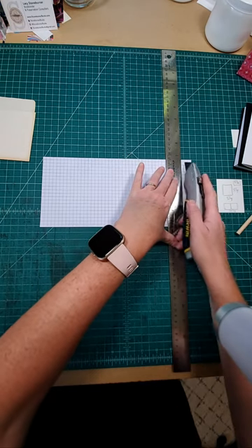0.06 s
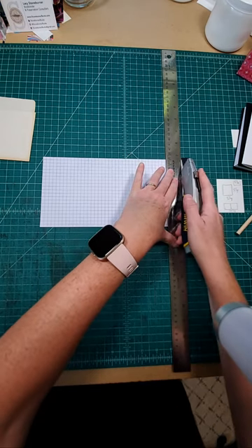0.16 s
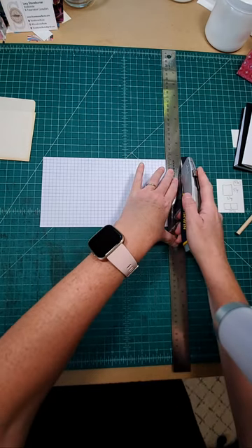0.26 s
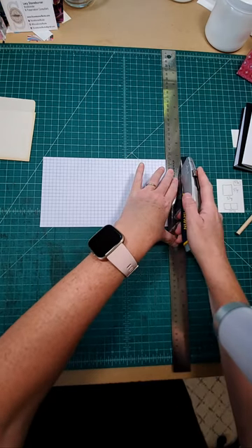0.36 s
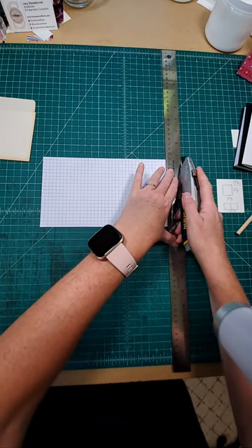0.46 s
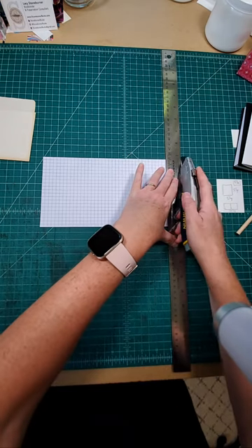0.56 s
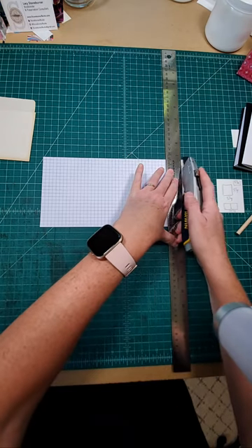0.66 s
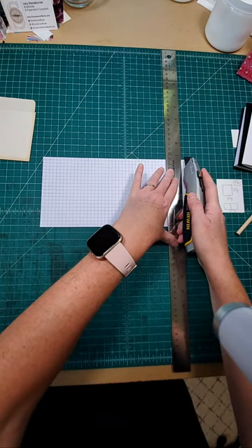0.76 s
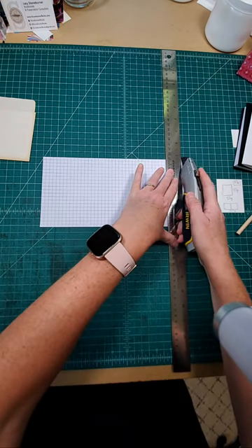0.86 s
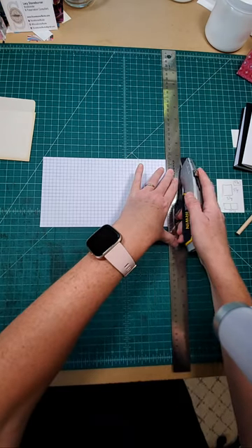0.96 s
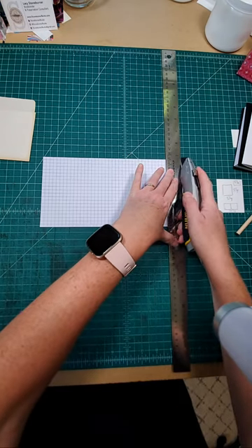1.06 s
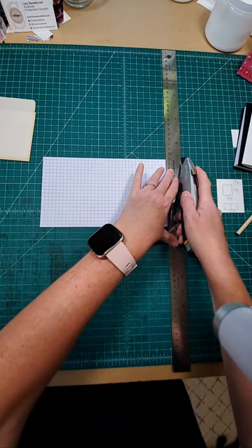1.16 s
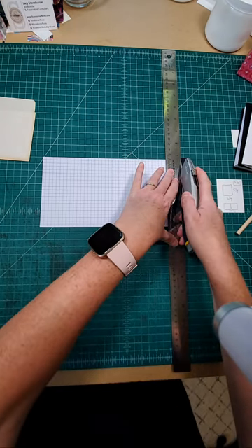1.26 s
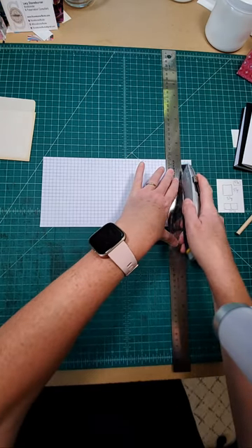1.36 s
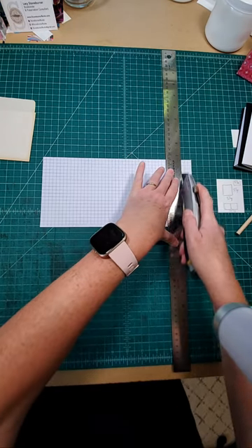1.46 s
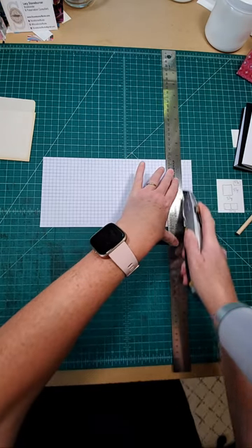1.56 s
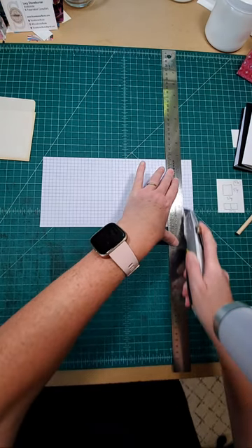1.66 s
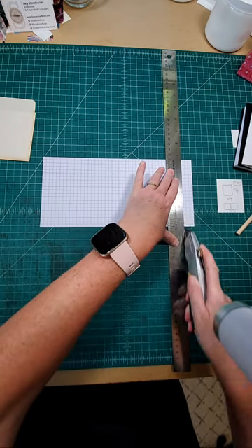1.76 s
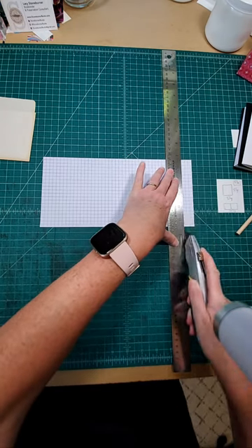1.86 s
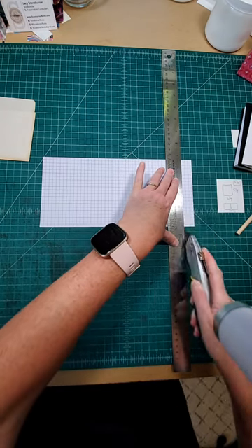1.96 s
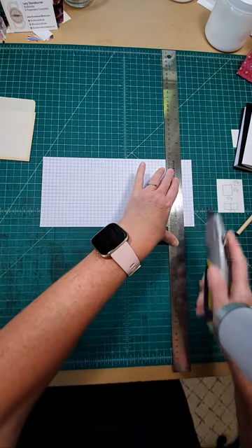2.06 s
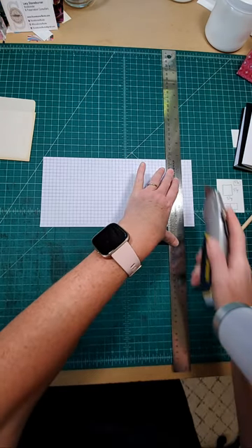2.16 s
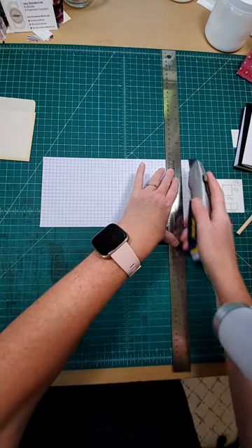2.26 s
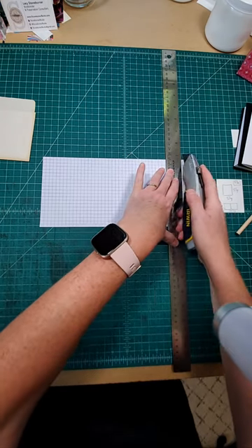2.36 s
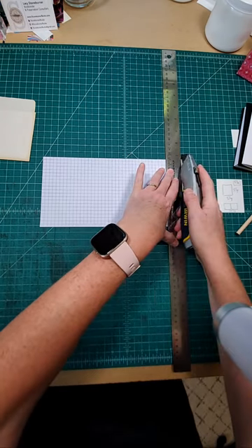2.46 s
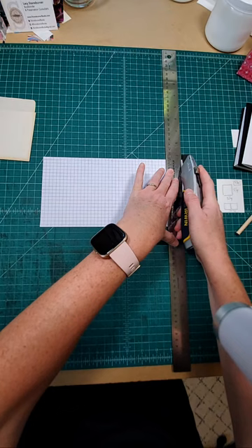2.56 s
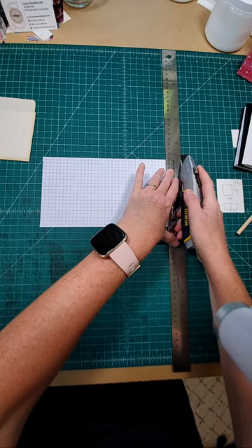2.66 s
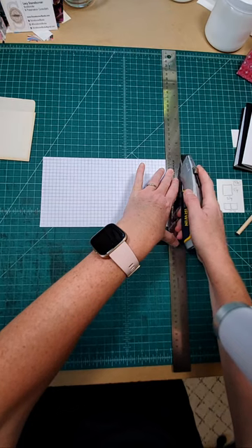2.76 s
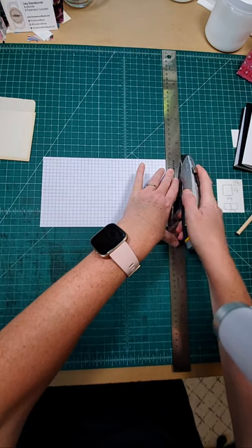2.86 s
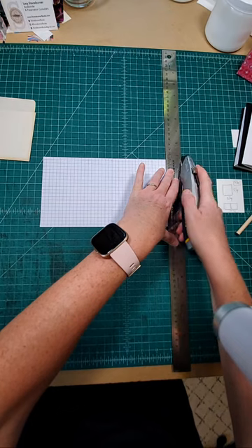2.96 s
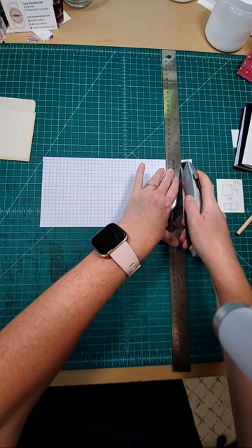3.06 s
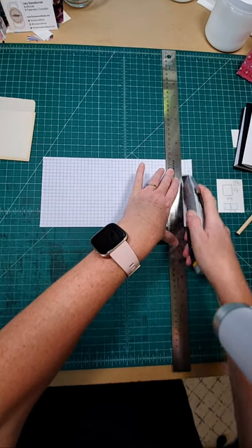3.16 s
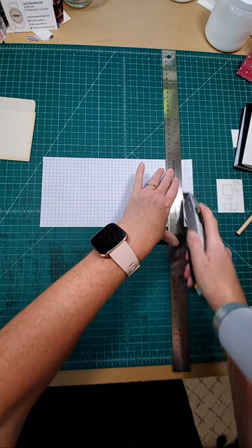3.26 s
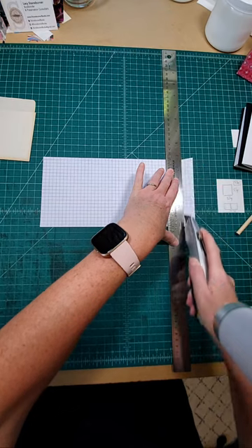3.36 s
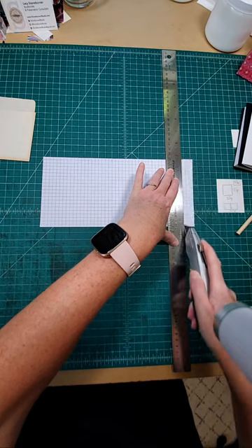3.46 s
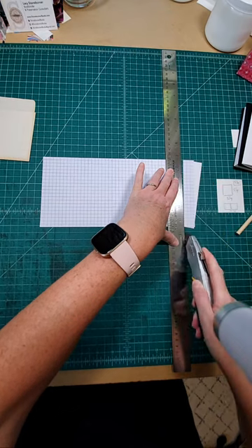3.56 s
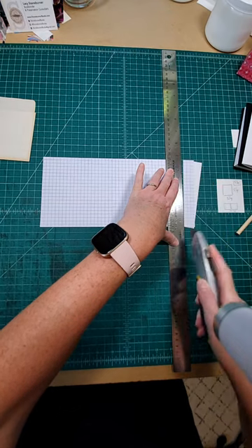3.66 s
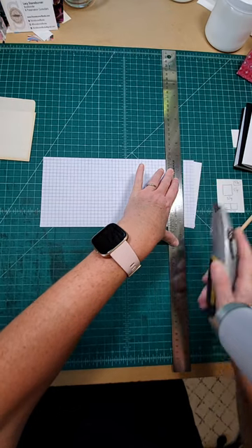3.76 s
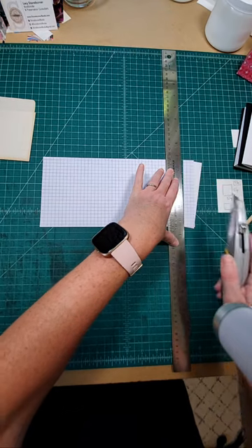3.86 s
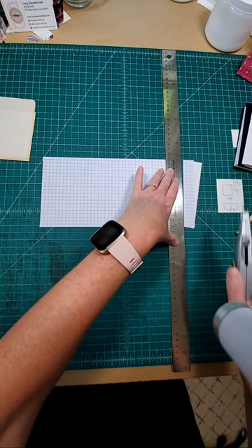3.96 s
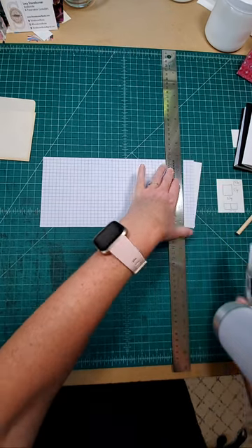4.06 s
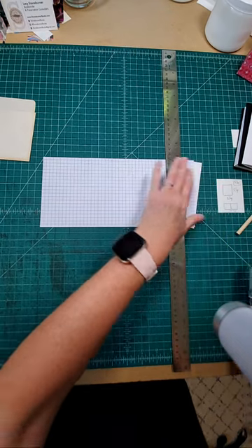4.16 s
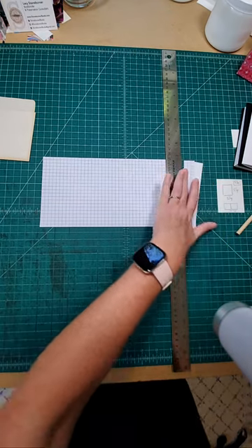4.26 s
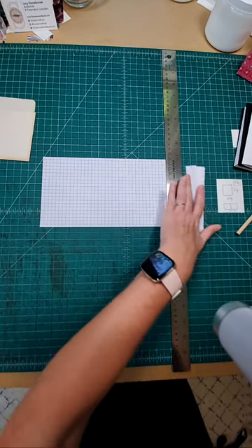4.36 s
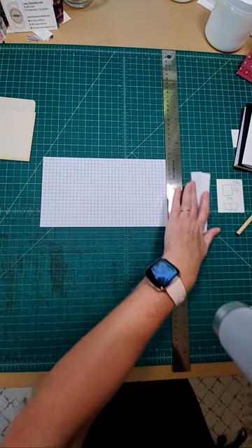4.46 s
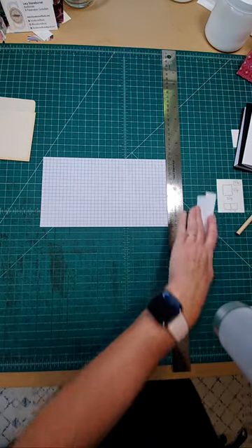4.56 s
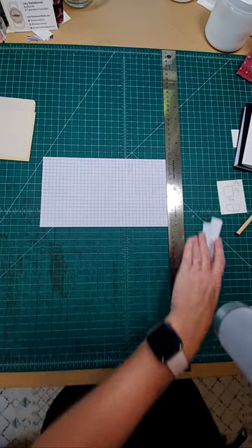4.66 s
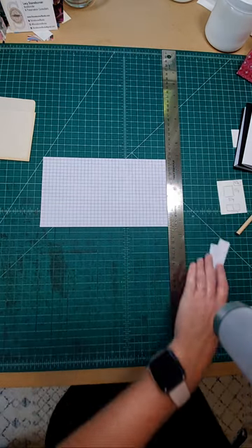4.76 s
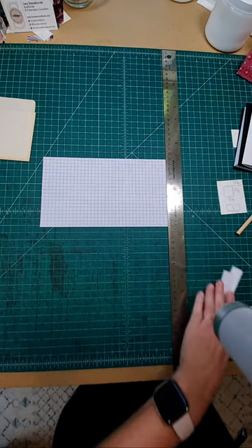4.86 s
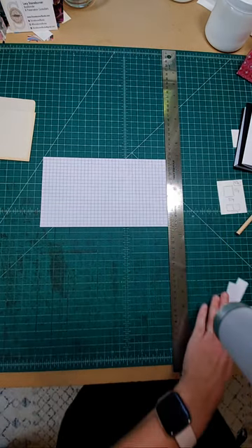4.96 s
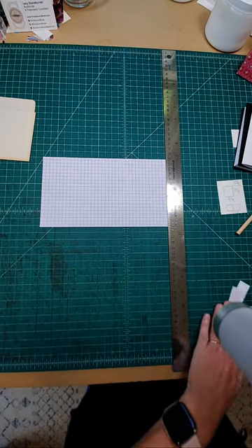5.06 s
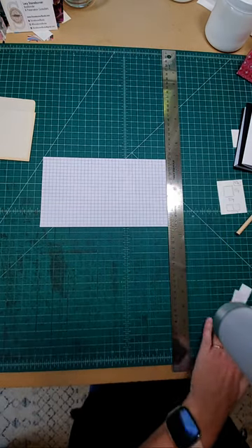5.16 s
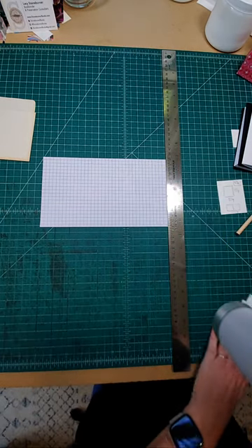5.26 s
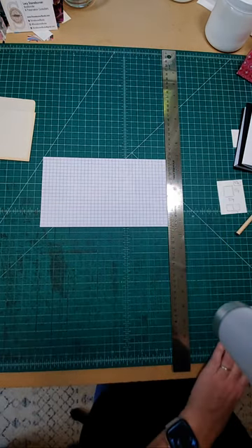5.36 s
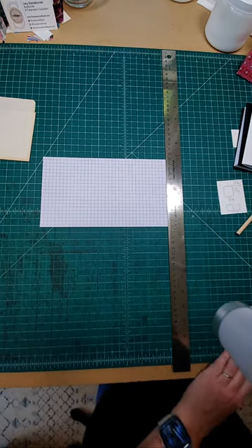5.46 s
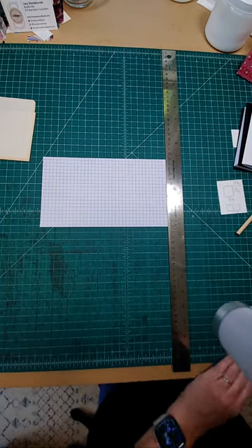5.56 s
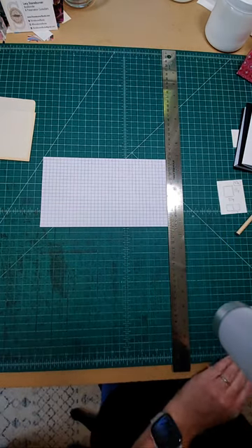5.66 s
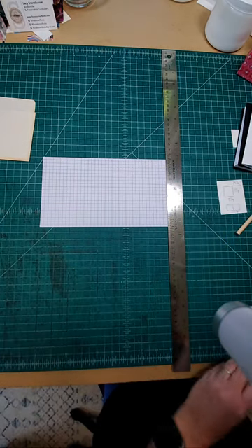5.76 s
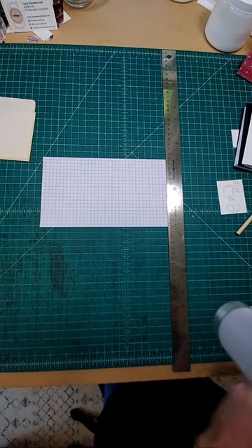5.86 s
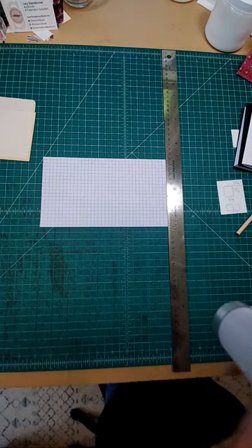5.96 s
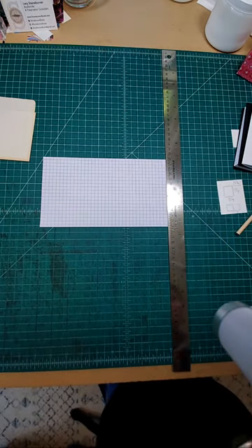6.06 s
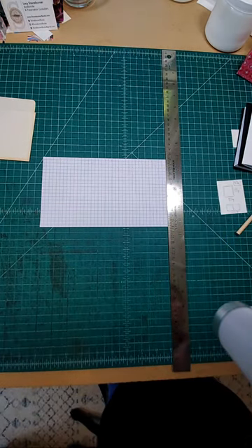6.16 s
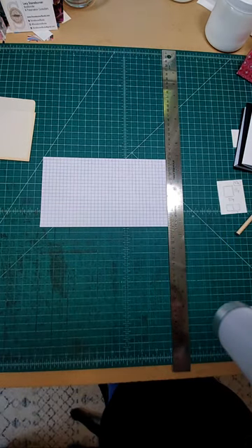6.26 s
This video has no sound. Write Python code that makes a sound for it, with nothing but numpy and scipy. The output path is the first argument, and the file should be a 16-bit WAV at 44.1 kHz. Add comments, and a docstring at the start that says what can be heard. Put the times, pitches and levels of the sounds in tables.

```python
"""A utility knife cuts twice through paper on a mat, along a steel ruler, heard close up.
Fibres snap under the blade as rasp and hiss; the blade ticks on the ruler and drops onto the desk.
The knife is put down and a hand sweeps the offcuts away. Plastic and metal things clatter, scrape
and groan at the desk edge; knocks send bending waves through the desk top. The room is small."""
import sys
import numpy as np
from scipy import signal
from scipy.fft import rfft, irfft
from scipy.io import wavfile
from scipy.ndimage import map_coordinates

SR = 44100
rng = np.random.default_rng(int(sys.argv[2]) if len(sys.argv) > 2 else 0)


def to_wav(s):
    """Save 16-bit WAV."""
    ch = np.atleast_2d(s).T  # columns
    pcm = np.round(np.clip(ch, -1, 1) * 32767)  # PCM
    wavfile.write(sys.argv[1], SR, pcm.astype(np.int16))


N = 278395


def cutting(rasp_db=0.5, blade_db=-3, hiss_db=-8, whistle_db=-16, drone_db=-0.5):
    """Fibres snap in bunches and ring the blade; drag shakes the desk. All grow with blade speed."""
    # (start [s], end [s], attack [s], release [s], level [dB], relative hiss [dB])
    strokes = [(1.327, 1.792, 0.17, .012, -41.5, -2.5), (3.009, 3.43, .07, 0.033, -45, 1)]
    # blade pressed into the mat: (resonance [Hz], width [Hz], gain [dB])
    blade_peaks = [(1210, 200, -6.5), (1444, 69, -2.5), (2914, 160, 3), (3620, 240, 3), (6500, 340, -19)]
    # spectra of the cut: (frequency [Hz], gain [dB])
    rasp_spectrum = [(470, -32.5), (800, -0.5), (928, -7.5), (1160, 0), (1260, 0.5), (1430, 0),
                     (1780, -4.5), (2090, -4.5), (2400, -5), (2920, -3.5), (3740, -5), (4510, -13.5),
                     (6440, -9.5), (7780, -30.5), (8500, -33), (11000, -55.5), (18700, -120)]
    hiss_spectrum = [(4710, -53.5), (8000, -17.5), (8730, -10), (11300, -2.5), (15200, -3.5), (15900, -6.5),
                     (16300, -10), (16500, -44)]
    drone_spectrum = [(50, -27), (90, -8), (125, -8.5), (161, 1), (215, -9), (270, -5), (310, -11.5),
                      (355, 0.5), (430, -1.5), (560, -15.5), (665, -5.5), (780, -22.5), (950, -28),
                      (1300, -49)]
    snaps = grains(per_s=16000, spread_db=-0.7) * flutter(per_s=410, depth_db=3)
    blade = resonate(grains(per_s=5000, spread_db=1.1), blade_peaks, sway_db=3)
    blade = drift(band(blade, 1000, 7000), per_s=12, depth_db=.4)  # pressure bends the resonances
    whistle = drift(band(snaps, 10900, 11700, order=2), per_s=14, depth_db=.25)
    whistle *= flutter(per_s=40, depth_db=2.5)
    rasp = undb(rasp_db) * colour(snaps, rasp_spectrum) + undb(blade_db) * blade
    fibres = grains(per_s=44000, spread_db=1.5) * flutter(per_s=390, depth_db=2.2)
    hiss = undb(hiss_db) * colour(fibres, hiss_spectrum) + undb(whistle_db) * whistle
    drone = undb(drone_db) * colour(grains(per_s=5500, spread_db=1.5), drone_spectrum)
    # rasp turns to hiss as the knife nears the body
    rasp_db_per_s, hiss_db_per_s, drone_db_per_s = -9.5, 5.5, 9.5
    out = np.zeros(N)
    for start_s, end_s, attack_s, release_s, db, crisp_db in strokes:
        speed = gesture(start_s, end_s - start_s, attack_s, release_s) * flutter(per_s=51, depth_db=1.14)
        drawn_s = np.clip(np.arange(N) / SR, start_s, end_s) - start_s
        out += undb(db) * (rasp * speed ** 1.22 * undb(rasp_db_per_s * drawn_s)
                           + hiss * speed * undb(crisp_db + hiss_db_per_s * drawn_s)
                           + drone * speed ** 0.74 * undb(drone_db_per_s * drawn_s))
    return out


def knife_ticks():
    """Blade and knife body touch the ruler or desk and ring faintly."""
    # (time [s], level [dB], tilt [dB/octave])
    hits = [(0.101, -82, 0), (0.277, -78, 3.5), (0.44, -55, -2), (0.6275, -55.5, 3), (0.635, -53.5, -1),
            (0.965, -68, -2), (1.279, -65.5, 0.5), (1.291, -58.5, 1.5), (1.7785, -40.5, -4),
            (1.942, -54, -1), (1.965, -50, 4), (1.973, -49.5, -3), (2.427, -81, -11.5), (2.631, -58.5, -3),
            (2.645, -61.5, -4), (2.7485, -62.5, -4.5), (2.834, -45.5, 1.5), (3.003, -50.5, 3),
            (3.612, -73.5, -9), (3.634, -52.5, 0), (3.754, -77, -10.5), (3.833, -80, -4), (3.895, -73.5, 2)]
    # (frequency [Hz], level [dB], t60 [s])
    knife_modes = [(1367, -9, .04), (1850, -8, .05), (2169, -5, .06), (2620, -2, .04), (2945, -1, .045),
                   (3300, -5, .035), (3881, -6, .035), (4845, -6, .03), (5600, -6, .03), (6300, -7, .03)]
    # radiating bands: (low [Hz], high [Hz], gain [dB])
    knife_bands = [(330, 950, -18.5), (1163, 2250, -5.5), (2290, 3600, 2.5), (4540, 6280, 0),
                   (9480, 14300, -3)]
    return clicks(hits, knife_modes, knife_bands,
                  contact_s=0.0039, chatter_s=0.0091, chatter_db=-4.5, ring_db=-36.5, detune=0.06)


def desk_knocks(ring_db=-36, shudder_db=-24, shudder_s=0.026):
    """Low bending waves travel slower, so a knock falls in pitch before the desk rings out."""
    # (time [s], level [dB], lowest frequency at that spot [Hz], contact cut-off [Hz])
    blows = [(0.095, -63, 84.7, 201), (0.437, -55.5, 78, 199), (0.964, -65.5, 123, 235),
             (1.283, -56.5, 132, 340), (1.605, -40.5, 167.7, 435), (1.78, -27, 116.7, 320),
             (1.865, -56, 130.6, 250), (1.945, -55.5, 117.7, 280), (2.429, -65.5, 96.8, 218),
             (2.631, -59, 90.6, 210), (2.752, -54, 126.7, 232), (3.000, -51.5, 107.8, 457),
             (3.403, -45, 127.3, 332), (3.436, -40.5, 125, 232), (4.238, -49.5, 87.4, 199.3),
             (4.351, -31.5, 88.56, 624), (4.37, -33.5, 76.2, 276), (4.949, -31, 73.86, 442),
             (5.524, -28.5, 86.5, 611), (5.58, -35, 89.8, 481), (5.713, -45, 86, 343),
             (5.800, -41, 82.5, 263), (5.829, -35.5, 83.9, 328), (6.016, -46.5, 79.7, 170),
             (6.062, -44, 85.6, 460), (6.239, -46.5, 86, 260), (6.267, -42.5, 81.2, 226)]
    # (frequency [Hz], level [dB], t60 [s])
    desk_modes = [(68, -5, .28), (85, -1, .28), (120, 2, .3), (159, 0, .24), (188, -5, .2), (247, 0, .18),
                  (345, 0, .18), (410, -5, .14), (510, -9, .12), (655, -7, .14), (740, -9, .14)]
    out, t = np.zeros(N), np.arange(SR // 2) / SR
    hz = np.fft.rfftfreq(2 * len(t), 1 / SR)
    for at_s, db, lowest_hz, contact_hz in blows:
        board = undb(ring_db) * ring(desk_modes, t, scatter_db=0.5) / 4
        board += undb(shudder_db) * np.exp(-t / shudder_s) * rng.standard_normal(len(t))
        board[0] += 1  # the impact
        lag_cycles = 3.2 * (84.98 / lowest_hz) ** 1.8  # stiffer spots lag less
        lag_s = lag_cycles * np.maximum(1 / np.maximum(hz, lowest_hz) - 1 / contact_hz, 0)
        dispersion = np.exp(-2j * np.pi * np.cumsum(lag_s) * hz[1])
        wave = irfft(rfft(board, 2 * len(t)) * dispersion)[:len(t)]
        wave = band(wave, lowest_hz, max(contact_hz, lowest_hz + 20))
        add(out, at_s, undb(db) * wave / np.std(wave[:SR // 25]))
    return out


def plastic_clatter():
    """The knife handle is set down; hard plastic things clack at the desk edge."""
    # (time [s], level [dB], tilt [dB/octave])
    hits = [(4.352, -42.5, 1.5), (4.369, -36.5, 0), (4.9487, -42, -4), (4.957, -46, 4), (5.054, -53, -3),
            (5.078, -39.5, 0), (5.175, -62, -5.5), (5.206, -47.5, 1), (5.229, -52, 1), (5.255, -56, -1),
            (5.287, -47, -2.5), (5.295, -54.5, 9), (5.334, -52, -3), (5.343, -50, -1), (5.354, -39.5, 6),
            (5.3585, -29.5, 2), (5.524, -37, -5), (5.533, -38, 3.5), (5.582, -47, -5.5), (6.069, -60, 0.5),
            (6.217, -73.5, 9)]
    # (frequency [Hz], level [dB], t60 [s])
    plastic_modes = [(1138, 1.5, 0.05), (1400, 1.5, 0.047), (1850, -21, 0.045), (2183, 10, 0.024),
                     (4180, 12, 0.049), (5040, 1, 0.029)]
    # radiating bands: (low [Hz], high [Hz], gain [dB])
    plastic_bands = [(367, 1020, -21), (970, 2010, 1.5), (2450, 3610, -2), (4650, 6400, -2.5),
                     (9600, 15700, 0.5)]
    return clicks(hits, plastic_modes, plastic_bands,
                  contact_s=0.0037, chatter_s=0.0088, chatter_db=-2.5, ring_db=-17, detune=0.044)


def metal_rattle():
    """A loose metal part rattles: short contacts, longer ring."""
    # (time [s], level [dB], tilt [dB/octave])
    hits = [(5.548, -45, -4), (5.63, -47.5, -3), (5.64, -52, -2.5), (5.724, -62.5, -3), (5.795, -56, -2.5),
            (5.8085, -41, -1), (5.838, -39.5, 0), (5.883, -73, 1)]
    # (frequency [Hz], level [dB], t60 [s])
    metal_modes = [(1065, -6, 0.082), (1760, -26, 0.23), (2560, 3, 0.07), (2536, 4, 0.067),
                   (2647, 12.5, 0.047), (3100, -22, 0.1), (4560, -25, .1)]
    # radiating bands: (low [Hz], high [Hz], gain [dB])
    metal_bands = [(340, 910, -12.5), (1030, 1890, -2), (2330, 3430, 4), (4170, 6140, -1.5),
                   (8800, 14200, 1.5)]
    return clicks(hits, metal_modes, metal_bands,
                  contact_s=0.0017, chatter_s=0.0069, chatter_db=-3.5, ring_db=-17, detune=0.01)


def sweeping(attack_s=0.0064, release_s=0.04):
    """Paper and skin slide over the grain of the mat; the hiss wavers with uneven hand speed."""
    # paper nudged, then offcuts swept: (start [s], length [s], rustle [dB], hiss [dB])
    swipes = [(0.09, 0.034, -83.5, -73.5), (1.14, 0.042, -80.5, -76), (2.17, 0.08, -85, -97.5),
              (3.9, 0.073, -82, -76.5), (4.08, 0.036, -79.5, -81), (4.39, 0.12, -60, -52.5),
              (4.5, 0.058, -60.5, -50), (4.59, 0.085, -56.5, -50), (4.69, 0.078, -55.5, -53.5),
              (4.8, 0.13, -59.5, -56.5), (5.0, 0.2, -80, -67), (5.2, 0.063, -55, -63),
              (5.32, 0.1, -50, -55), (5.46, 0.21, -60.5, -64), (5.75, 0.098, -56, -57),
              (5.96, 0.1, -76, -69.5), (6.07, 0.075, -65, -59.5), (6.23, 0.025, -67.5, -65.5)]
    # hand on the mat: (start [s], length [s], level [dB])
    rubs = [(3.645, 0.055, -55.5), (4.67, 0.12, -61.5), (4.88, 0.071, -65.5)]
    # friction spectra: (frequency [Hz], gain [dB])
    hiss_spectrum = [(4880, -23), (8300, -14), (8970, -6.5), (9980, -5.5), (11400, -1.5), (15200, -8.5),
                     (16300, -5), (16500, -55)]
    rustle_spectrum = [(410, -16), (700, -3), (981, -31), (1120, -5), (1300, -3), (1640, 0.5), (2210, -3.5),
                       (2920, -3.5), (3670, -5.5), (6210, -5), (7500, -18.5), (9750, -71), (16500, -120)]
    skin_spectrum = [(200, -33), (400, -5), (620, -7.5), (780, -11.5), (1100, -25.5), (2000, -60)]
    fibres = grains(per_s=16000, spread_db=2)
    hiss = drift(colour(fibres, hiss_spectrum), per_s=12, depth_db=.2)
    hiss *= gestures(swipes, attack_s, release_s, column=3)
    rustle = colour(fibres, rustle_spectrum) * gestures(swipes, attack_s, release_s)
    skin = colour(rng.standard_normal(N), skin_spectrum) * gestures(rubs, attack_s, release_s)
    return rustle + hiss + skin


def scraping(gain_db=-3):
    """Quick slips excite a hollow plastic part."""
    # (start [s], length [s], relative level [dB])
    scrapes = [(1.06, 0.02, -71), (5.078, 0.01, -52), (5.21, 0.086, -60), (5.29, 0.0075, -29),
               (5.333, 0.026, -30.5)]
    # (resonance [Hz], width [Hz], gain [dB])
    hollow_peaks = [(1119, 44, 4), (1350, 70, -18), (1610, 240, -23), (2080, 68, -17), (4200, 170, -33)]
    slips = grains(per_s=4000, spread_db=.5)
    hollow = unit(band(resonate(slips, hollow_peaks, sway_db=1), 1130, 5000))
    return undb(gain_db) * hollow * gestures(scrapes, attack_s=0.0035, release_s=0.011)


def groan(second_db=-8, third_db=-27, jitter_db=0.06):
    """Something slides to its stop in regular stick-slip: nearly a pure tone with its octave."""
    # (time [s], slip rate [Hz], level [dB])
    slide = [(5.42, 314.5, -57), (5.441, 332.5, -44.5), (5.468, 355.6, -46.5), (5.501, 365, -41),
             (5.521, 412, -38), (5.535, 380, -68)]
    at_s, hz, _ = np.transpose(slide)
    slip_hz = np.interp(np.arange(N) / SR, at_s, hz) * flutter(per_s=290, depth_db=jitter_db)
    phase = 2 * np.pi * np.cumsum(slip_hz) / SR
    tone = np.sin(phase) + undb(second_db) * np.sin(2 * phase) + undb(third_db) * np.sin(3 * phase)
    return unit(tone * flutter(per_s=420, depth_db=5.5)) * swell(slide, column=2)


def leaning():
    """Arms lean and shift on the desk: a low rumble."""
    # (time [s], level [dB])
    rumble_levels = [(0, -73), (0.55, -70), (0.85, -81), (1.1, -69.5), (2.35, -75), (3.4, -59.5),
                     (3.95, -78.5), (4.45, -61), (4.7, -69), (5.3, -64), (6.31, -52)]
    # (frequency [Hz], gain [dB])
    rumble_spectrum = [(30, -24.5), (75, 5), (110, -5), (180, -3), (300, -10), (600, -21.5), (1200, -45.5)]
    rumble = colour(rng.standard_normal(N), rumble_spectrum)
    return rumble * swell(rumble_levels) * flutter(per_s=21, depth_db=2.1)


def room(x, wet_db, t60_s=0.28, onset_s=0.0017, treble_db=-6):
    """Short diffuse tail of a small furnished room."""
    t = np.arange(SR // 2) / SR
    noise = rng.standard_normal(len(t)) * (1 - np.exp(-(t / onset_s) ** 2))
    tail = band(noise, 150, 6500) + undb(treble_db) * band(noise, 9500, 17000)
    tail *= undb(-60 * t / t60_s)
    return undb(wet_db) * signal.fftconvolve(x, tail / np.linalg.norm(tail))[:N]


def room_air(level_db=-73):
    """Steady, quiet noise of the room."""
    # (frequency [Hz], gain [dB])
    air_spectrum = [(15, -42), (25, -13.5), (58, 2), (87, 5.5), (135, -17), (313, -18.5), (358, -12.5),
                    (1180, -26.5), (1550, -21), (7920, -37), (11600, -27.5), (14800, -27.5), (16500, -43)]
    return undb(level_db) * colour(rng.standard_normal(N), air_spectrum)


def clicks(hits, modes, bands, contact_s, chatter_s, chatter_db, ring_db, detune):
    """Hard contacts: a scuff as the parts meet, a crack, brief chatter and the part's ring."""
    scuff_s, scuff_db = 0.0077, -16
    firm_db, pivot_hz = -42.5, 4000
    out, lead = np.zeros(N), SR // 40
    t = np.arange(-lead, SR // 4) / SR
    after_s = np.maximum(t, 0)
    scuff = undb(scuff_db) * np.exp(-np.abs(t) / scuff_s)
    chatter = undb(chatter_db) * np.exp(-after_s / chatter_s)
    friction = np.where(t < 0, scuff, chatter)
    for at_s, db, tilt_db_per_octave in hits:
        touch_s = max(contact_s * undb(firm_db - db) ** 0.087, 1 / SR)  # harder blows are shorter
        crack = np.exp(-(np.pi * after_s / touch_s - 1) ** 2) * (t > 0)
        hit = rng.standard_normal(len(t)) * (crack + friction)
        hit += undb(ring_db) * ring(modes, after_s, scatter_db=3.5, detune=detune)
        for lo_hz, hi_hz, band_db in bands:
            part = band(hit, lo_hz, hi_hz)
            octaves = np.log2(np.sqrt(lo_hz * hi_hz) / pivot_hz)
            gain = undb(db + band_db + tilt_db_per_octave * octaves)
            add(out, at_s - lead / SR, gain * part / np.std(part[lead:lead + SR // 100]))
    return out


def ring(modes, t, scatter_db, detune=0.):
    """Decaying modes; each blow weights them anew, and a change of grip shifts them."""
    chance = rng.standard_normal((len(modes), 3))
    return sum(np.sign(side) * undb(db + scatter_db * size - 60 * t / t60_s)
               * np.sin(2 * np.pi * hz * (1 + detune * grip) * t)
               for (hz, db, t60_s), (size, grip, side) in zip(modes, chance))


def resonate(x, peaks, sway_db):
    """Resonances that take turns as the contact shifts."""
    return sum(undb(db) * band(x, hz - width_hz / 2, hz + width_hz / 2, order=1)
               * flutter(per_s=30, depth_db=sway_db) for hz, width_hz, db in peaks)


def grains(per_s, spread_db):
    """Tiny snaps of random time and size; rms 1."""
    size = undb(spread_db * np.minimum(rng.exponential(size=N), 4))
    return unit((rng.random(N) < per_s / SR) * size * rng.standard_normal(N))


def flutter(per_s, depth_db):
    """Randomly wandering gain."""
    knots = np.arange(N) / SR * per_s
    return undb(depth_db * np.interp(knots, np.arange(8192), rng.standard_normal(8192)))


def drift(x, per_s, depth_db):
    """All frequencies wander together by a few percent; rms 1."""
    position = np.cumsum(flutter(per_s, depth_db))
    return unit(map_coordinates(x, [position], order=3, mode="mirror"))


def gesture(start_s, length_s, attack_s, release_s):
    """Speed of one movement, 0-1: gathers, holds, dies away."""
    t = np.maximum(np.arange(N) / SR - start_s, 0)
    return (1 - np.exp(-t / attack_s)) * np.exp(-np.clip((t - length_s) / release_s, 0, 20))


def gestures(rows, attack_s, release_s, column=2):
    """Power-summed gain of movements (start [s], length [s], level [dB], ...)."""
    gains = (undb(row[column]) * gesture(row[0], row[1], attack_s, release_s) for row in rows)
    return np.sqrt(sum(gain ** 2 for gain in gains))


def swell(rows, column=1):
    """Gain over time from a dB column; silent outside the curve."""
    rows = np.array(rows)
    return undb(np.interp(np.arange(N) / SR, rows[:, 0], rows[:, column], left=-200, right=-200))


def colour(x, points):
    """Filter by (frequency [Hz], gain [dB]) points; rms 1."""
    hz, db = np.transpose(points)
    bin_hz = np.maximum(np.fft.rfftfreq(len(x), 1 / SR), 1)
    gain = undb(np.interp(np.log(bin_hz), np.log(hz), db, left=-90, right=-90))
    return unit(irfft(rfft(x) * gain, len(x)))


def band(x, lo_hz, hi_hz, order=3):
    """Causal band-pass."""
    sos = signal.butter(order, [lo_hz, min(hi_hz, .45 * SR)], "band", fs=SR, output="sos")
    return signal.sosfilt(sos, x)


def add(out, at_s, x):
    """Mix x into out."""
    i = int(at_s * SR)
    out[i:i + len(x)] += x[:N - i]


def undb(db):
    """Decibels to gain."""
    return 10 ** (np.asarray(db) / 20)


def unit(x):
    """Scale to rms 1."""
    return x / np.sqrt(np.mean(x ** 2))


def scene():
    """Work on the desk, its echo and the room air; mono."""
    knife = knife_ticks()
    handled = plastic_clatter() + metal_rattle() + scraping() + groan()
    friction = cutting() + sweeping()
    knocks = desk_knocks()
    echo = (room(knife, wet_db=-9.5) + room(handled, wet_db=-11.5)
            + room(friction, wet_db=-10.5) + room(knocks, wet_db=-12))
    return (knife + handled + friction + knocks + echo + leaning() + room_air())[None]


def record(dry):
    """Steep low-pass at 16 kHz."""
    return signal.sosfilt(signal.ellip(10, .2, 70, 16000, fs=SR, output="sos"), dry)


dry = scene()
out = record(dry)
to_wav(out)
```